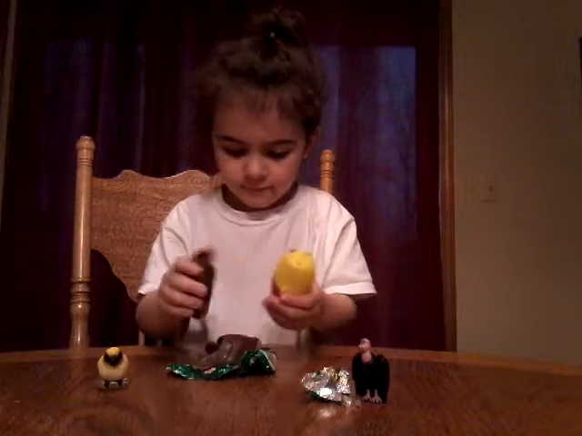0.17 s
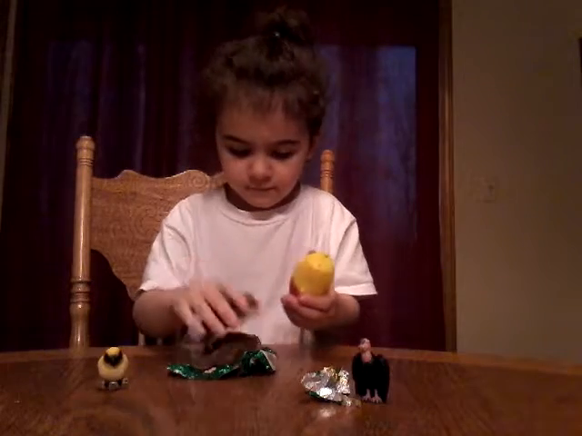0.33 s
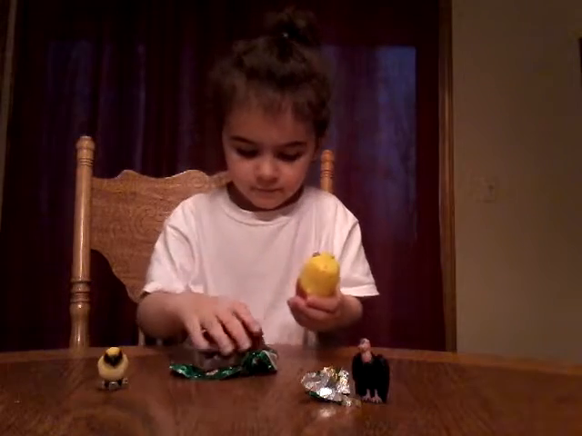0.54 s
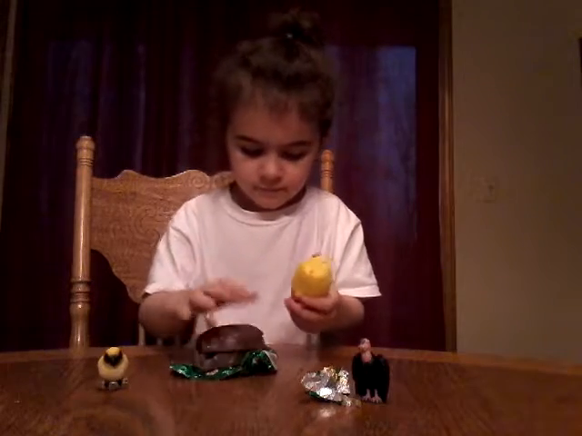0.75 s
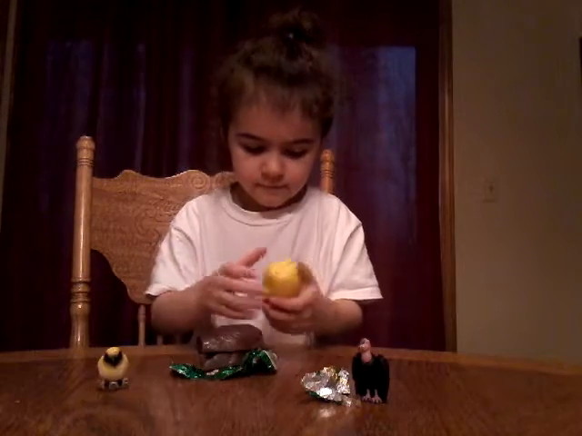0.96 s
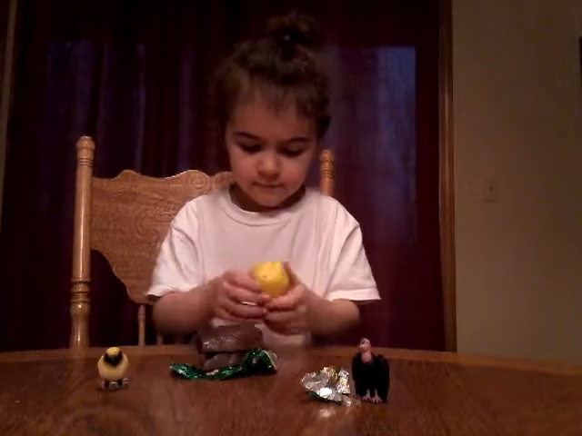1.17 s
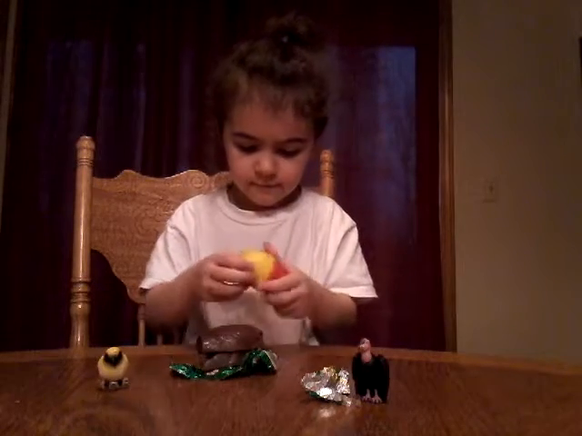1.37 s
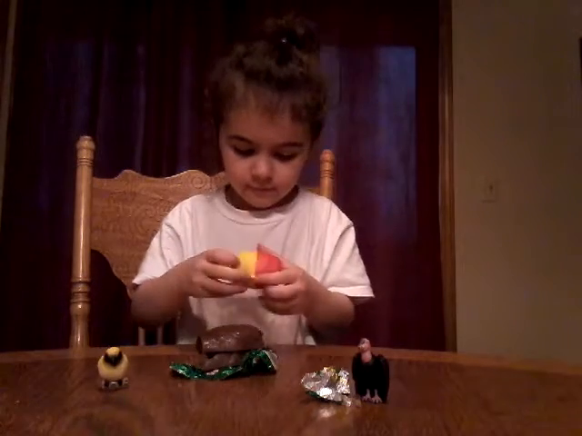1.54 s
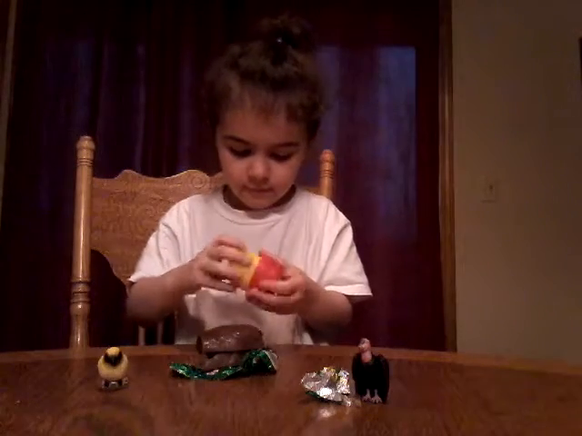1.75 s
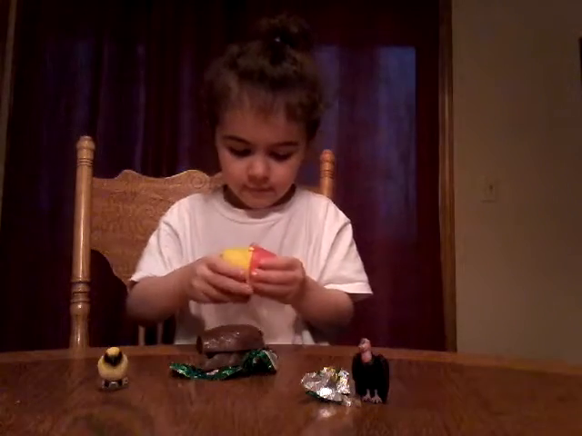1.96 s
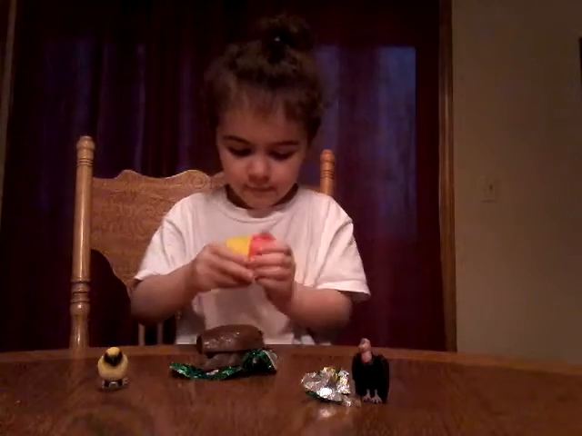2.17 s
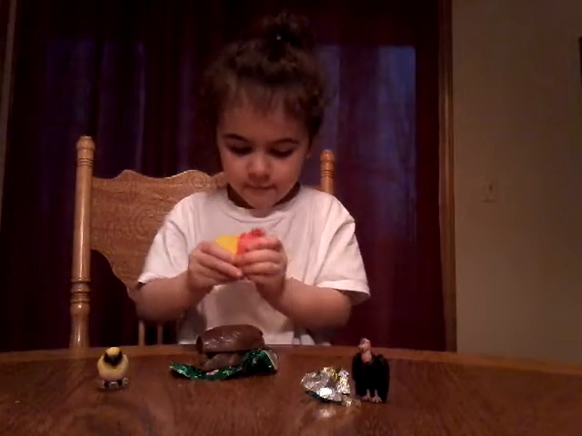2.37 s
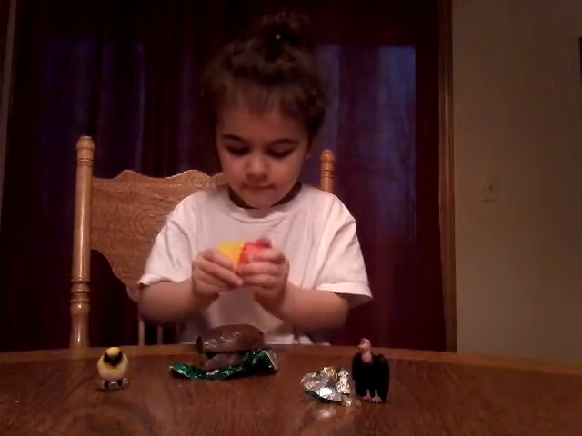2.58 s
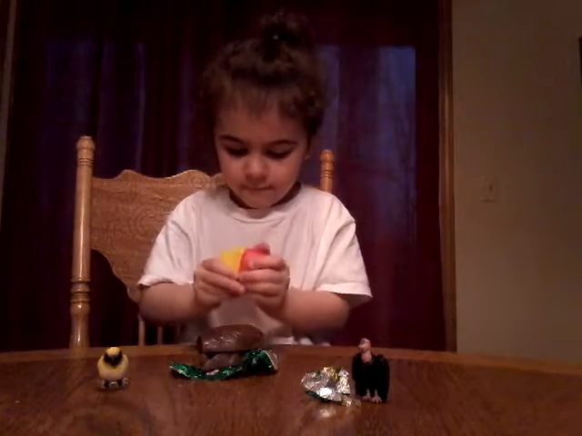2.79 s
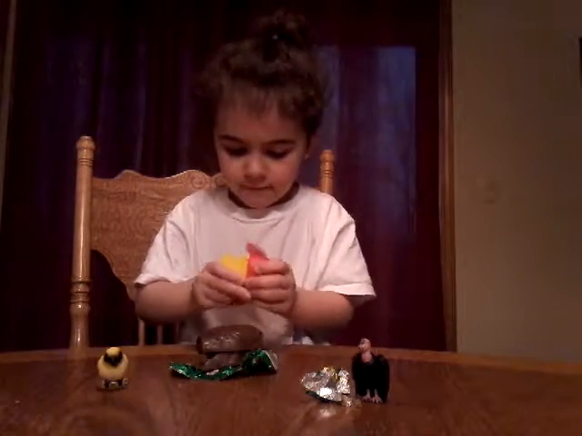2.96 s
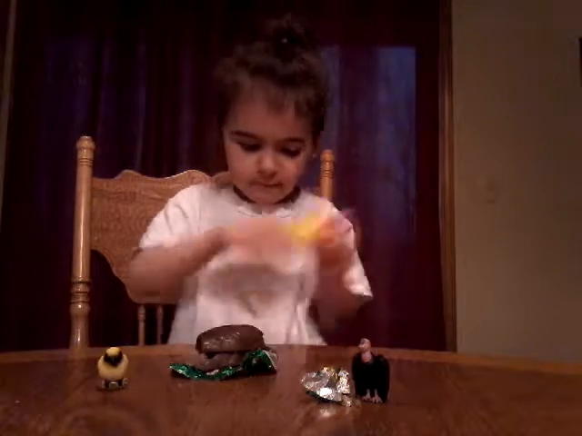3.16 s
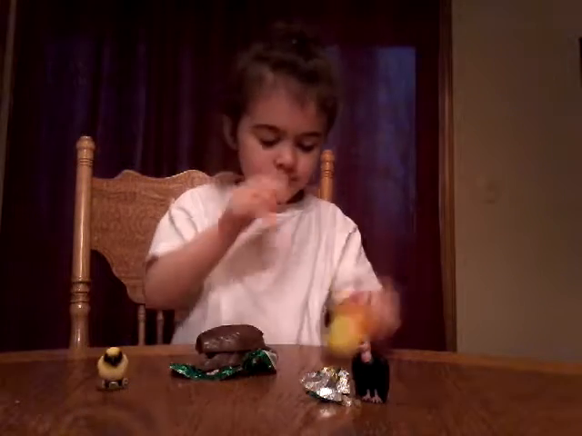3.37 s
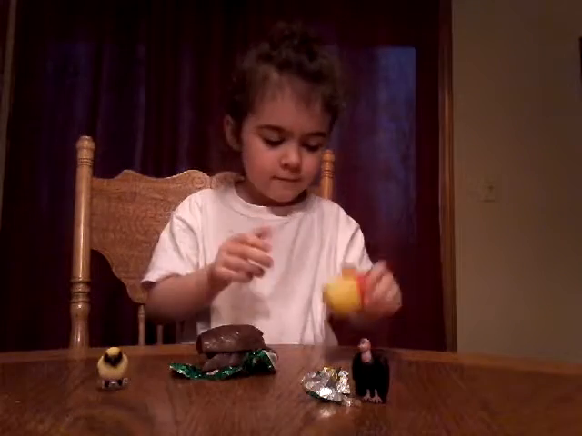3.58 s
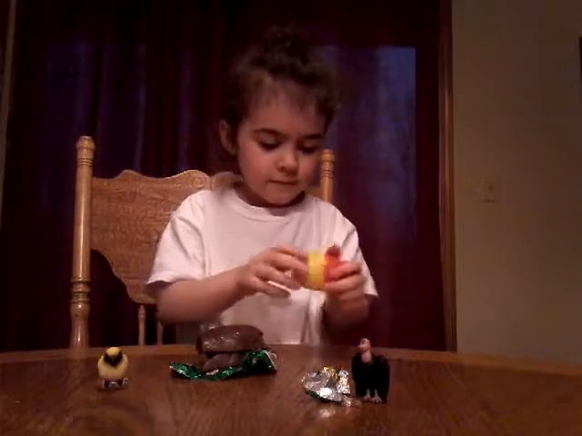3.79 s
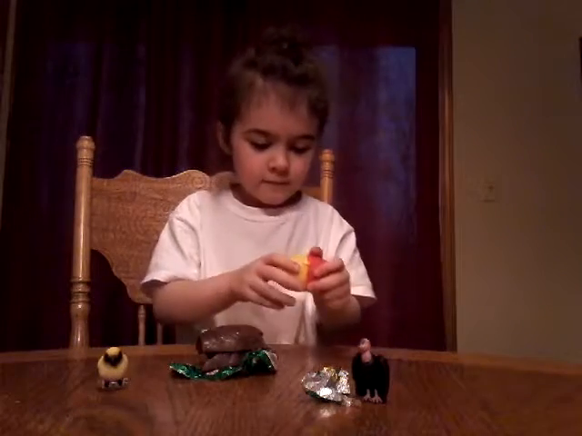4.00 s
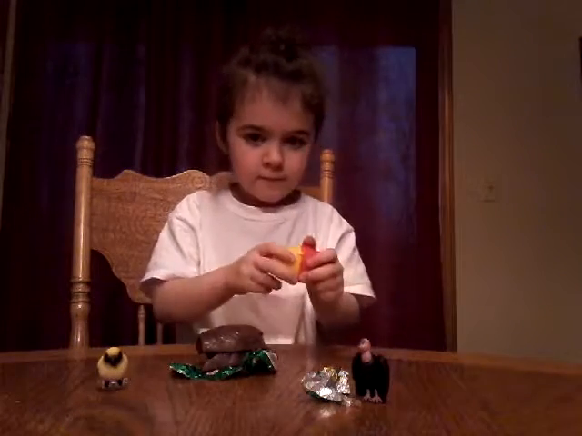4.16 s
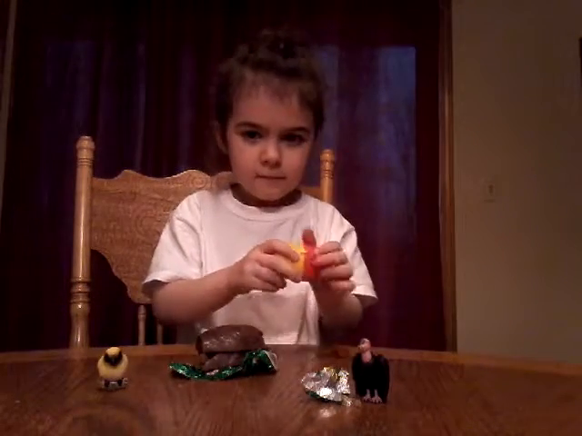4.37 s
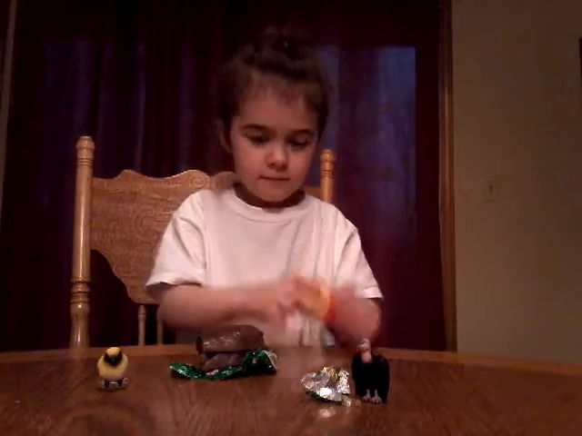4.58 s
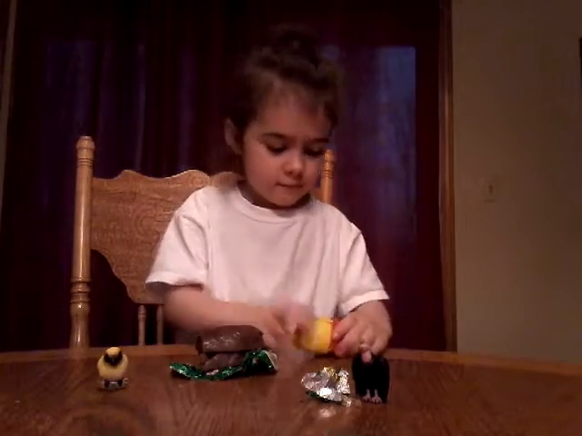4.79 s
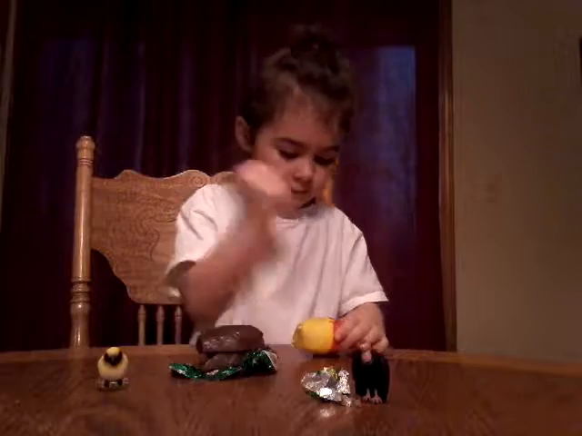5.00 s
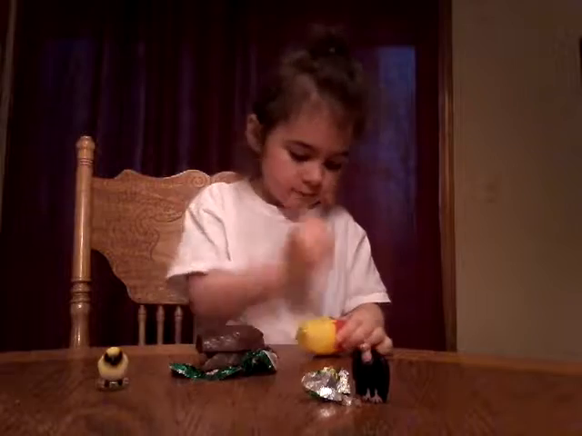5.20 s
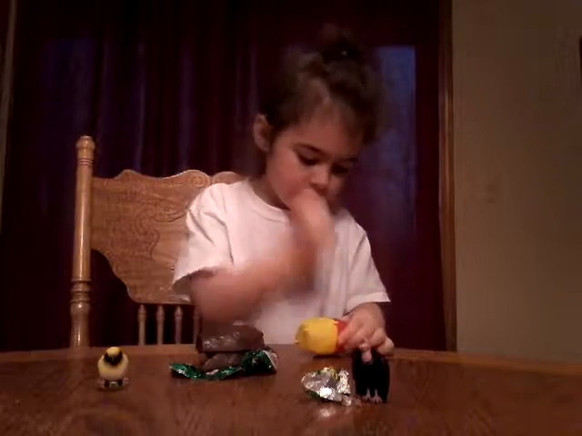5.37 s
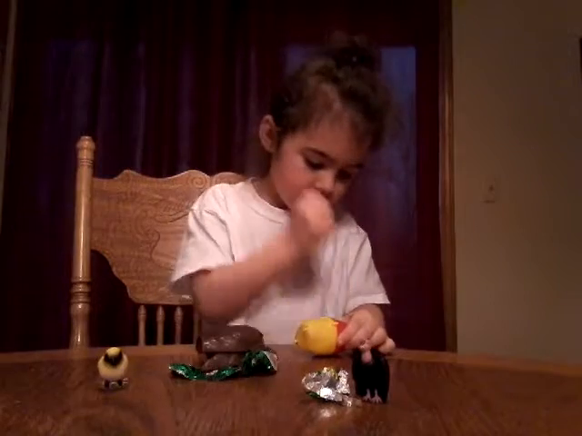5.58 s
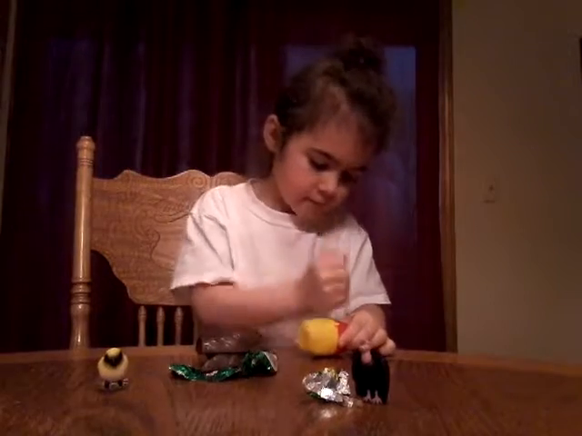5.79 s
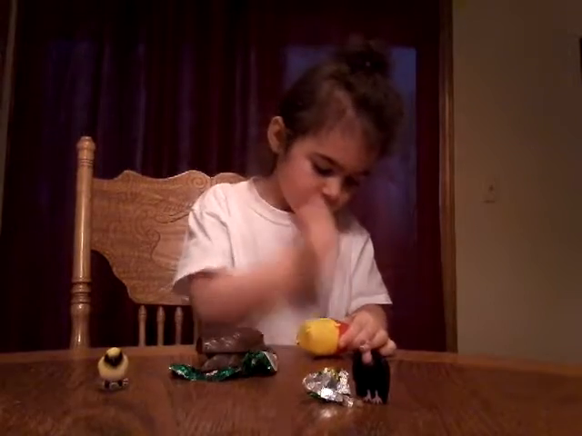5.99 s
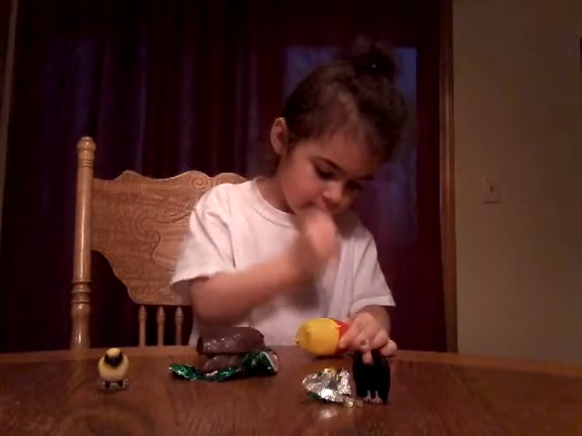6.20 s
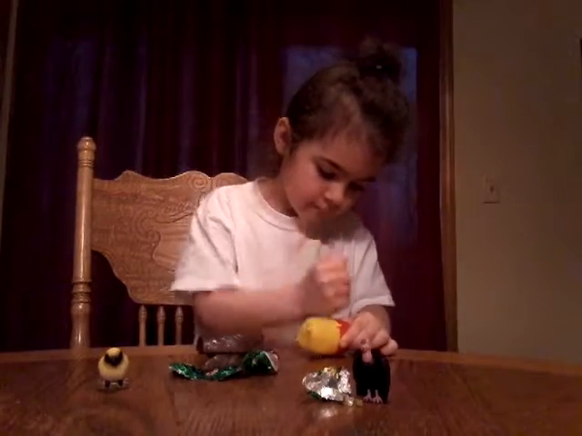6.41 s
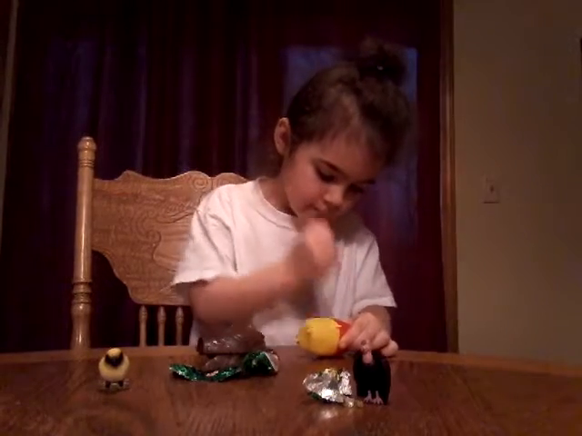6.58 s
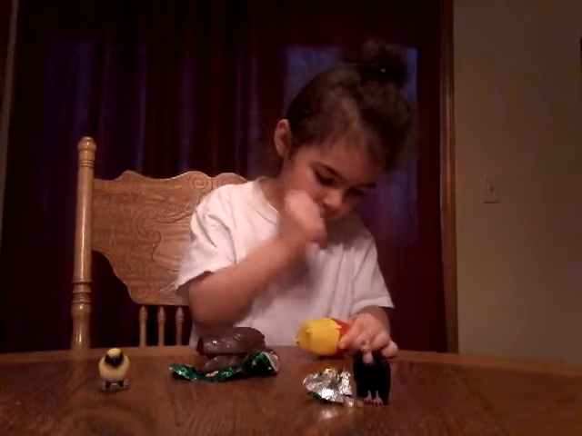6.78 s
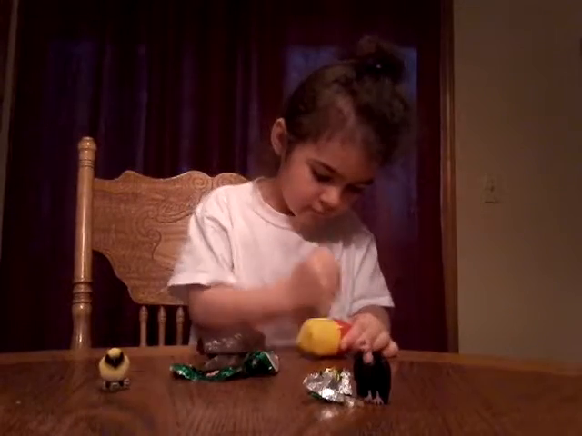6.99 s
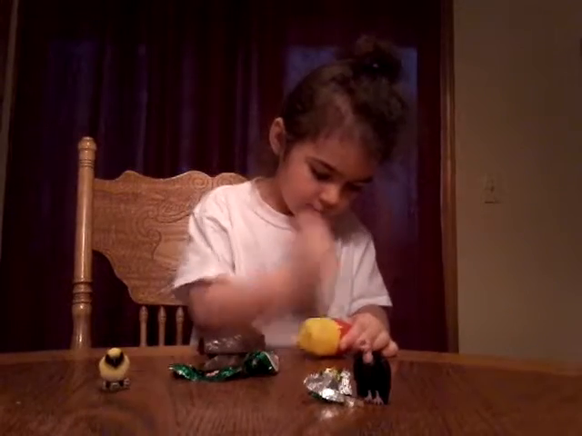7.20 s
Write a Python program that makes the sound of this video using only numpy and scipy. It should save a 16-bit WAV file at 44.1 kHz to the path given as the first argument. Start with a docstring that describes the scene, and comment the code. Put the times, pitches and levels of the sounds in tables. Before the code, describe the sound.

A hollow plastic toy capsule is handled at a wooden table in a fairly live room, close to the microphone. Around 0.4 to 0.6 seconds come a few light knocks and short rubs. Until about 3.3 seconds, fingers twist the plastic with very faint slides, ticks and small snaps. At 3.5 seconds the capsule is rapped once on the table, a loud, sharp, hollow clack. At 4.7 seconds it is laid down with softer knocks and a brief scrape. From 5.2 to about 7 seconds a fist pounds it six times, roughly three blows a second, the last a little later and weaker. Each blow slaps the shell, booms in the table and sets the loose plastic hopping with small clicks. Low house rumble, faint hiss and a thin, high electronic whine run underneath throughout.

```python
"""A wooden dining table in a fairly live room, on a camera microphone near enough for crisp contacts.
A child first fingers and twists a plastic toy capsule: faint slides, ticks and snaps, light knocks.
At 3.5 s the hollow shell is rapped once on the table top; at 4.7 s it is laid down. From 5.2 s a fist
pounds it six times: each blow slaps the shell, booms in the table and sets the loose plastic hopping.
House rumble, faint hiss and the camera's thin electronic whine lie under it all."""
import sys
import numpy as np
from scipy import signal
from scipy.fft import rfft, irfft
from scipy.io import wavfile
from scipy.ndimage import uniform_filter1d

SR = 44100
rng = np.random.default_rng(int(sys.argv[2]) if len(sys.argv) > 2 else 0)


def store_wav(level_fs):
    """Save 16-bit WAV to argv[1]."""
    pcm = np.round(np.clip(np.atleast_2d(level_fs), -1, 1) * 32767)
    wavfile.write(sys.argv[1], SR, pcm.T.astype(np.int16))


N = 319725
TIME = np.arange(N) / SR
RING_TIME = TIME[:SR]


# fist blows: t/s, table level/dB, slap level/dB, slap tilt/(dB/octave)
FIST_BLOWS = [(5.1642, -16.5, -28, 5), (5.4912, -15.5, -27, 3), (5.7944, -16, -20, 1.5),
              (6.103, -16, -25.5, 1), (6.460, -17, -25, 1.5), (6.9378, -21, -32, 1.65)]
# spectrum of the fist on the shell: f/Hz, level/dB
SLAP_COLOUR = [(120, 13), (350, -4.5), (700, 4), (1150, -2), (1500, -5.5), (2200, -4.5), (3700, -20.5),
               (6000, -18), (9000, -34.5), (15000, -41.5)]
# the whole table swaying on its legs: f/Hz, level/dB, t60/s
SWAY_MODES = [(58.8, -19, 1), (89.6, -19, 0.4), (102.9, -0.5, 0.23)]
# the table settling in ever smaller bumps: t/s after the rebound, level/dB
SETTLING_BUMPS = [(0, 1.5), (.029, -4.5), (.076, -14.5)]

def fist_blows(lead_s=0.008, rise_s=0.0022, fall_s=0.0067, push_lag_s=0.009, rebound_lag_s=0.0355):
    """The fist crushes the shell onto the table, which sways and bends, then drops back on its legs."""
    bend_db, rebound_db = -5, -2  # against the sway; against the push
    out = np.zeros(N)
    t = RING_TIME[:SR // 10] - lead_s
    crush = np.exp(np.minimum(t / rise_s, -t / fall_s))
    for s, table_db, slap_db, tilt_db in FIST_BLOWS:
        add(out, s - lead_s, undb(slap_db) * burst(crush, SLAP_COLOUR, tilt_db, passes=2))
        sway = strike(SWAY_MODES, contact_s=0.0015)
        bend = undb(bend_db) * table_thud(contact_s=0.0015)
        add(out, s + push_lag_s, undb(table_db) * unit(sway + bend))
        for lag_s, bump_db in SETTLING_BUMPS:
            bump = -undb(table_db + rebound_db + bump_db) * table_thud(contact_s=0.0045)
            add(out, s + rebound_lag_s + lag_s, bump)
    return out


# bending modes of the table top: f/Hz, level/dB, t60/s
TABLE_TOP_MODES = [(135.2, 4.5, 0.077), (154, -10.5, 0.11), (193, -5.5, 0.14), (233.7, -12.5, 0.19),
                   (251, -14, 0.19), (284, -12.5, 0.097), (383.8, -11.5, 0.16), (427, -6, 0.17),
                   (447, -14.5, .09), (525, -13.5, 0.083)]
# spectrum of boards and joints: f/Hz, level/dB
WOOD_COLOUR = [(50, -25.5), (100, 2.5), (160, 1.5), (260, -4), (420, -8), (560, -11), (800, -14),
               (1500, -23.5), (4000, -45.5)]

def table_thud(contact_s, rumble_db=-2, fall_s=0.022):
    """The table top rings its clearest modes inside a dense rumble of boards and joints."""
    ring = strike(TABLE_TOP_MODES, contact_s)
    softened = [(hz, db - 10 * np.log10(1 + (hz * contact_s) ** 2)) for hz, db in WOOD_COLOUR]
    rumble = burst(np.exp(-RING_TIME[:SR // 5] / fall_s), softened, passes=2)
    add(ring, 0, undb(rumble_db) * rumble)
    return unit(ring)


# the capsule under each blow: t/s, level/dB, tilt/(dB/octave), landing t/s, landing level/dB
CAPSULE_BOUNCES = [(5.1642, -30.5, -4, 5.2229, -38), (5.5044, -29.5, -3, 5.5486, -40),
                   (5.7948, -27, -2, 5.8566, -38.5), (6.1035, -24.5, -3, 6.1677, -37),
                   (6.4695, -36.5, 3.5, 6.528, -35.5), (6.935, -38.5, -2, 7.0028, -37)]
# spectrum of loose plastic hitting wood: f/Hz, level/dB
CLICK_COLOUR = [(200, -7.5), (800, 7.5), (1900, 7), (3800, 0), (5200, -6), (7000, -2.5), (9500, -9.5),
                (15000, -13.5)]

def capsule_bounces(contact_s=0.00035, shell_db=-17, table_db=-6.5, hop_s=0.047, hop_db=-12.5):
    """The capsule cracks against the table, jumps and lands twice, ringing shell and wood a little."""
    out = np.zeros(N)
    for s, db, tilt_db, landing_s, landing_db in CAPSULE_BOUNCES:
        add(out, s, undb(db) * click(CLICK_COLOUR, tilt_db, fall_s=0.00111))
        for lag_s, loss_db in (0, 0), (hop_s, hop_db):
            landing = undb(shell_db) * shell_clack(contact_s) + undb(table_db) * table_thud(contact_s)
            add(landing, 0, click(CLICK_COLOUR, tilt_db=-2, fall_s=0.00138))
            add(out, landing_s + lag_s, undb(landing_db + loss_db) * landing)
    return out


# things rapped or set down on the table: t/s, shell level/dB, table level/dB, contact/s
KNOCKS = [(0.379, -45.5, -41.5, 0.001), (0.382, -47, -40, 0.0013), (.515, -45, -38.5, 0.00024),
          (.546, -69, -46, 0.0014), (3.44, -43, -56, 0.000082), (3.4542, -14, -20, 0.00023),
          (4.7, -45, -40.5, 0.0015), (4.7344, -42.5, -38.5, .0012), (4.744, -34.5, -35.5, 0.0025)]
# spectrum of the crack at the contact: f/Hz, level/dB
CRACK_COLOUR = [(200, -11), (900, 1.5), (2000, 5), (3200, 0), (4400, -4.5), (5050, 2.5), (5900, -3),
                (7000, -6), (8500, -9.5), (11000, -13.5), (15000, -20)]

def knocks(table_cut_hz=100, crack_db=-11, soft_contact_s=0.0031):
    """A crack at the contact, the hollow clack, then the table top; too light to sway the table."""
    out = np.zeros(N)
    low_cut = signal.butter(2, table_cut_hz, "high", fs=SR, output="sos")
    for s, shell_db, table_db, contact_s in KNOCKS:
        hardness = 1 / (1 + (contact_s / soft_contact_s) ** 2) ** 2
        add(out, s, undb(shell_db + crack_db) * hardness * click(CRACK_COLOUR, 0, fall_s=0.001))
        add(out, s + 0.0012, undb(shell_db) * shell_clack(contact_s))
        add(out, s + 0.002, undb(table_db) * signal.sosfilt(low_cut, table_thud(contact_s)))
    return out


# the hollow capsule held against the table top: f/Hz, level/dB, t60/s
SHELL_MODES = [(282.6, -7, 0.068), (400, -9, 0.1), (475, -1, 0.034), (626, -6, 0.021), (739, -6.5, 0.077),
               (874, 3.5, 0.016), (1145, 3, 0.03), (1395, -3, 0.013), (1550, -2, 0.02), (1960, -9.5, 0.016)]
# spectrum of the wood under the shell: f/Hz, level/dB
CLACK_COLOUR = [(60, -35.5), (130, -6.5), (300, -8.5), (500, 4), (1000, -2), (1500, 3), (1750, -14),
                (2300, -17.5), (3200, -21.5), (8000, -38)]

def shell_clack(contact_s, wood_db=-3, fall_s=0.0095, low_hz=170):
    """The hollow shell's modes sound with the short, dense ring of the wood under it."""
    ring = strike(SHELL_MODES, contact_s, spot_db=0, detune=0.0079)
    add(ring, 0, undb(wood_db) * burst(np.exp(-RING_TIME[:SR // 10] / fall_s), CLACK_COLOUR))
    # a small shell radiates little bass; a soft contact excites little treble
    high_hz = np.clip(1 / contact_s, 2 * low_hz, SR / 3)
    band = signal.butter(2, [low_hz, high_hz], "band", fs=SR, output="sos")
    return unit(signal.sosfilt(band, ring))


# ticks of settling chocolate, snaps of the rim: t/s, level/dB, tilt/(dB/octave), ring level/dB
TICKS_AND_SNAPS = [(0.6383, -52, -9, -57), (1.5159, -57, -7, -83), (1.847, -69.5, 8, -65.5),
                   (2.3938, -57, 9, -79), (3.3287, -58, -6.5, -70), (3.3338, -50, 1, -50),
                   (4.7317, -49.5, 8.5, -63)]
# spectrum of a tick or snap: f/Hz, level/dB
TICK_COLOUR = [(300, -22), (2200, -13), (3000, 0.5), (4200, -2), (5300, -10.5), (6600, -1.5), (9000, -21),
               (15000, -27.5)]

def ticks_and_snaps():
    """A chocolate shell ticks as it settles on the table, or the capsule's rim snaps in its seam."""
    out = np.zeros(N)
    for s, db, tilt_db, ring_db in TICKS_AND_SNAPS:
        add(out, s, undb(db) * click(TICK_COLOUR, tilt_db, fall_s=0.0018))
        add(out, s, undb(ring_db) * shell_clack(contact_s=0.00025))
    return out


# firm slides on plastic and wrapper: middle t/s, half length/s, level/dB, tilt/(dB/octave)
FINGER_SLIDES = [(0.455, .009, -50.5, -2.5), (0.485, .012, -44.5, -7.5), (0.522, .0045, -41, -6.5),
                 (1.058, 0.0084, -68, 1), (1.367, .043, -60, 2.5), (1.604, .044, -62, -2),
                 (2.227, 0.01, -65.5, -1.5), (2.932, 0.0079, -68.5, -1), (3.075, .07, -63.5, -1.5),
                 (4.392, .017, -61, 2), (4.873, .0073, -47.5, 0.5), (5.024, .01, -63.5, -1.5)]

def fingers(twist_s=(0.9, 2.15), shifts=5, shift_half_s=0.025, shift_db=-71, scatter_db=5):
    """Fingers slide firmly, and shift their grip faintly at uneven moments as they twist the capsule."""
    out = np.zeros(N)
    middle_s = RING_TIME[:SR // 2].mean()
    for s, half_s, db, tilt_db in FINGER_SLIDES:
        add(out, s - middle_s, undb(db) * slide(half_s, tilt_db))
    for s, (late, firm) in zip(np.linspace(*twist_s, shifts), rng.standard_normal((shifts, 2))):
        shift = undb(shift_db + scatter_db * firm) * slide(shift_half_s, tilt_db=-1)
        add(out, s + shift_half_s * late - middle_s, shift)
    return out


# spectrum of skin rubbing plastic up to 9 kHz, with a thin added fizz above: f/Hz, level/dB
RUB_COLOUR = [(300, -7), (1500, -8.5), (3000, -5), (4200, -11.5), (5800, -5), (7200, -4), (9000, -14),
              (15000, -9.5)]

def slide(half_s, tilt_db, scatter_db=1.8):
    """Dense tiny slips of uneven size swell and fade, centred in half a second."""
    t = RING_TIME[:SR // 2]
    slips = rng.standard_normal(len(t)) * undb(scatter_db * rng.exponential(size=len(t)))
    swell = np.exp(-0.5 * ((t - t.mean()) / half_s) ** 2)
    return unit(signal.fftconvolve(slips * swell, response(RUB_COLOUR, tilt_db)))


def strike(modes, contact_s, spot_db=2, detune=0.035, detune_hz=200):
    """Damped modes under one push; a longer contact leaves the high ones quiet."""
    out = np.zeros(SR)
    for (hz, db, t60), (spot, grip) in zip(modes, rng.standard_normal((len(modes), 2))):
        # each blow finds another spot, and the hand's load shifts the higher modes most
        gain = undb(db + spot_db * spot) / (1 + (hz * contact_s) ** 2)
        pitch_hz = hz * (1 + detune * min(hz / detune_hz, 2) * grip)
        t = RING_TIME[:int(t60 * SR)]
        envelope = np.exp(-np.log(1000) * t / t60) * (1 - np.exp(-t / contact_s))
        add(out, 0, gain * envelope * np.sin(2 * np.pi * pitch_hz * t))
    return unit(out)


def click(colour, tilt_db, fall_s):
    """A hard contact chatters for a millisecond or two."""
    return burst(np.exp(-RING_TIME[:SR // 50] / fall_s), colour, tilt_db)


def burst(envelope, colour, tilt_db=0, passes=5):
    """A flurry of tiny contacts excites all pitches evenly and takes the colour of the object."""
    force = rng.standard_normal(len(envelope)) * envelope
    for _ in range(passes):  # flatten the spectrum, then restore the envelope
        flat = irfft(np.exp(1j * np.angle(rfft(force))), len(envelope))
        local_rms = np.sqrt(uniform_filter1d(flat ** 2, size=64).clip(0) + 1e-18)
        force = flat * envelope / local_rms
    return unit(signal.fftconvolve(force, response(colour, tilt_db)))


def response(colour, tilt_db, size=1024):
    """Minimum-phase impulse response of a spectrum tilted by dB per octave."""
    hz = np.fft.rfftfreq(size, 1 / SR)
    db = shape(colour, hz) + tilt_db * np.log2(np.maximum(hz, colour[0][0]))
    cepstrum = irfft(np.log(undb(db)))
    cepstrum[1:size // 2] *= 2
    cepstrum[size // 2 + 1:] = 0
    return irfft(np.exp(rfft(cepstrum)))


def shape(points, hz):
    """A spectrum read on a log-frequency axis."""
    point_hz, value = np.transpose(points)
    return np.interp(np.log(hz + 1), np.log(point_hz), value)


def undb(db):
    """Decibels to gain."""
    return 10 ** (np.asarray(db) / 20)


def unit(x):
    """Scale a short sound to the energy of 10 ms at full level."""
    return x / np.sqrt(np.sum(x ** 2) / (SR / 100))


def add(track, s, sound):
    """Mix a sound in from time s."""
    i = max(int(s * SR), 0)
    track[i:i + len(sound)] += sound[:N - i]


# reverberation of the dining room: f/Hz, t60/s, level/dB
ROOM_BANDS = [(67.4, 0.97, -13.5), (139, 0.63, -8.5), (337, 0.69, -2), (732, 0.76, -3.5), (1340, 0.73, -1),
              (2745, 0.7, -5), (4800, 0.66, -5.5), (6850, 0.55, -1.5), (7800, 0.52, -5),
              (14920, 0.72, -9.5)]
# table, wall and ceiling reflections at the microphone: t/s after the direct sound, level/dB
REFLECTIONS = [(.0035, -17.5), (0.0122, -11), (0.0186, -17), (.0243, -12.5)]

def room(x, wet_db=-1, build_s=0.0045):
    """The direct sound reaches the microphone, then reflections and a tail longest in the deep bass."""
    hz = np.fft.rfftfreq(SR, 1 / SR)
    noise = rfft(rng.standard_normal(SR))
    tail = np.zeros(SR)
    for centre_hz, t60, db in ROOM_BANDS:
        weight = shape([(band_hz, band_hz == centre_hz) for band_hz, _, _ in ROOM_BANDS], hz)
        tail += undb(db) * irfft(noise * weight, SR) * np.exp(-np.log(1000) * RING_TIME / t60)
    impulse = undb(wet_db) * tail * (1 - np.exp(-RING_TIME / build_s)) / np.sqrt(SR / 20)
    impulse[0] += 1  # direct sound
    for s, db in REFLECTIONS:
        impulse[int(s * SR)] += undb(db)
    return signal.fftconvolve(x, impulse)[:N]


# room tone at the microphone: f/Hz, level/dB
ROOM_TONE_COLOUR = [(25, -11), (45, -7.5), (90, -2), (150, -0.5), (350, -8), (700, -11.5), (1400, -17.5),
                    (2800, -21), (4500, -27.5), (6500, -31), (10000, -26), (15000, -33.5)]

def room_tone(level_db=-69):
    """The house rumbles low under a faint, even hiss."""
    gain = undb(shape(ROOM_TONE_COLOUR, np.fft.rfftfreq(N, 1 / SR)))
    noise = irfft(rfft(rng.standard_normal(N)) * gain, N)
    return undb(level_db) * noise / noise.std()


def scene():
    """Everything on the table sounds through the same room to one microphone."""
    table = knocks() + fist_blows() + capsule_bounces() + ticks_and_snaps() + fingers()
    return (room(table) + room_tone())[None]


# steady tones of the camera's electronics: f/Hz, level/dB
CAMERA_WHINE = [(4823, -93), (8382, -91.5), (13206, -55.5)]

def record(dry, port_hz=6500, port_width_hz=1000, port_db=6, low_hz=48, top_hz=15800, ceiling_db=-1):
    """The microphone drops deep bass, its port rings; the electronics round peaks, whine, cut the top."""
    sound = signal.sosfilt(signal.butter(4, low_hz, "high", fs=SR, output="sos"), dry)
    port = signal.lfilter(*signal.iirpeak(port_hz, port_hz / port_width_hz, fs=SR), sound)
    rounded = undb(ceiling_db) * np.tanh((sound + undb(port_db) * port) / undb(ceiling_db))
    whine = sum(np.sqrt(2) * undb(db) * np.sin(2 * np.pi * hz * TIME) for hz, db in CAMERA_WHINE)
    low_pass = signal.ellip(8, 0.2, 70, top_hz, fs=SR, output="sos")
    return signal.sosfilt(low_pass, rounded + whine)


dry = scene()
out = record(dry)
store_wav(out)
```